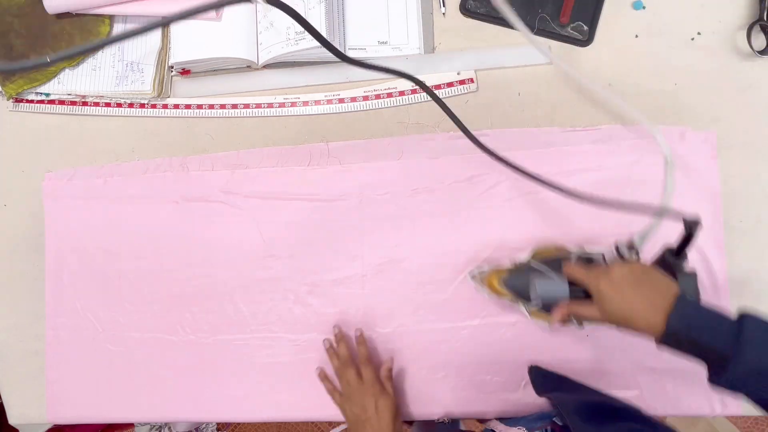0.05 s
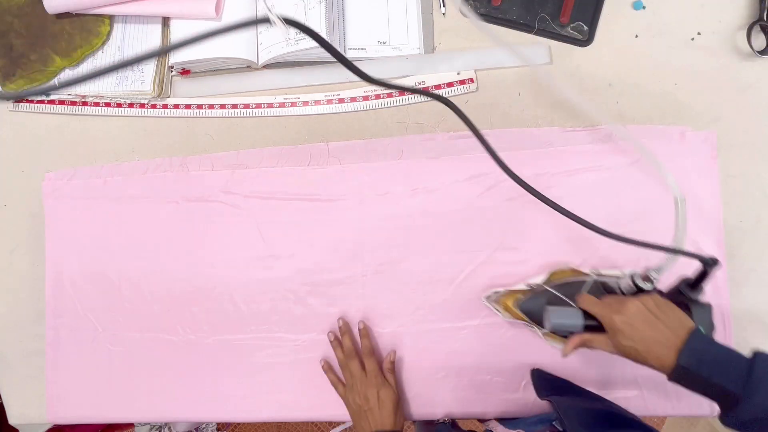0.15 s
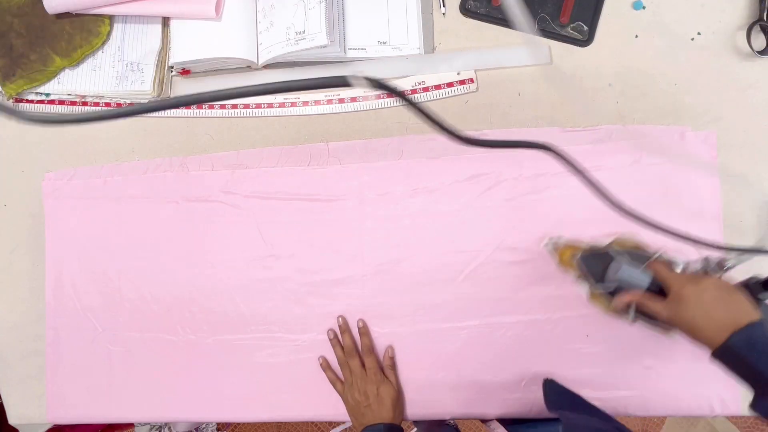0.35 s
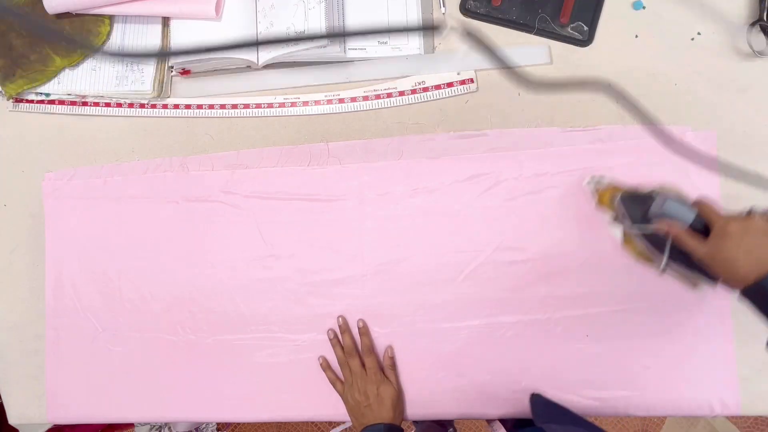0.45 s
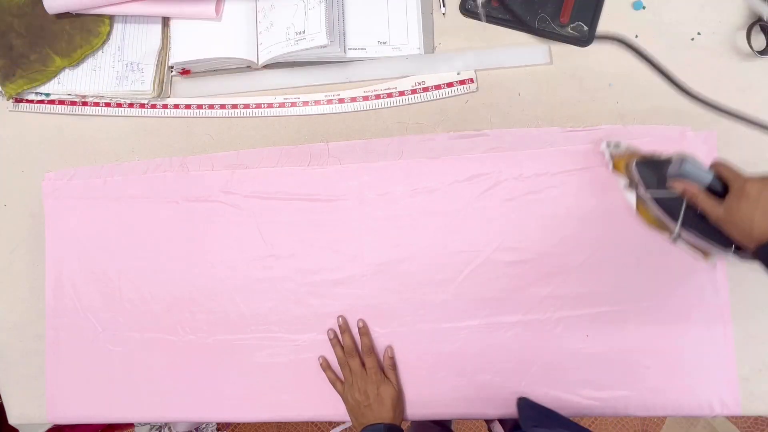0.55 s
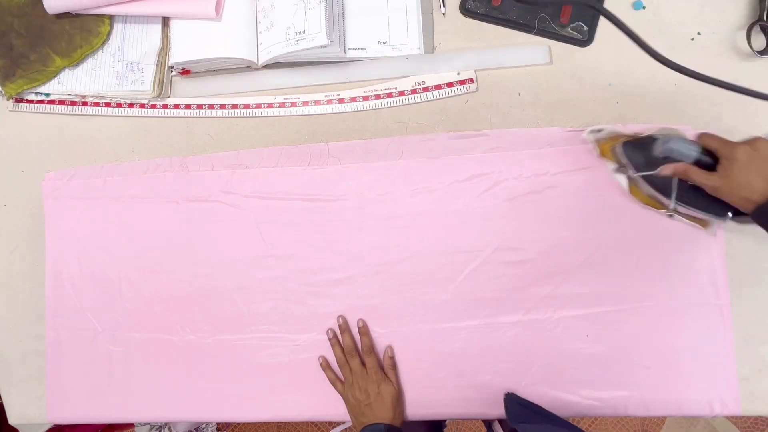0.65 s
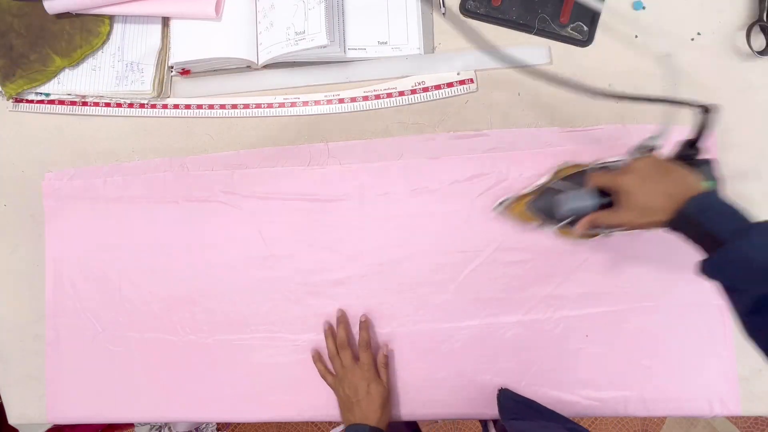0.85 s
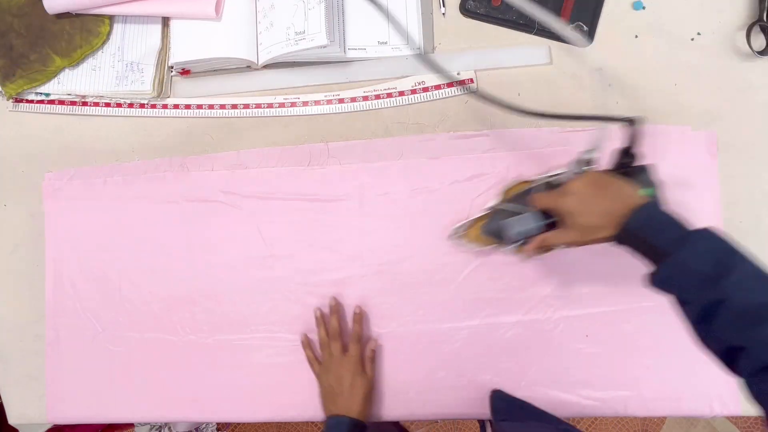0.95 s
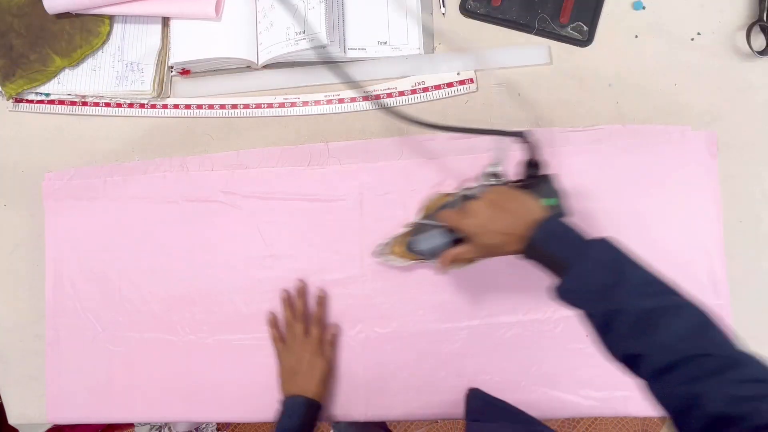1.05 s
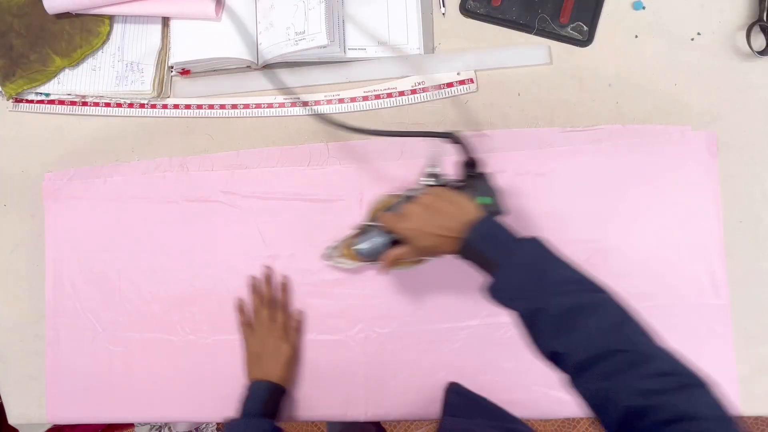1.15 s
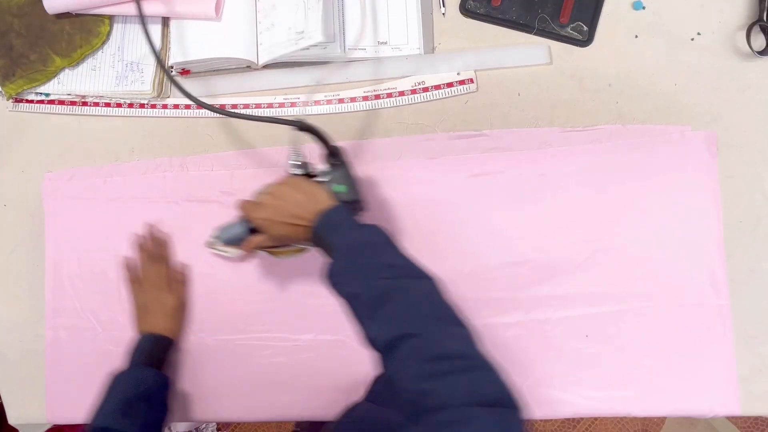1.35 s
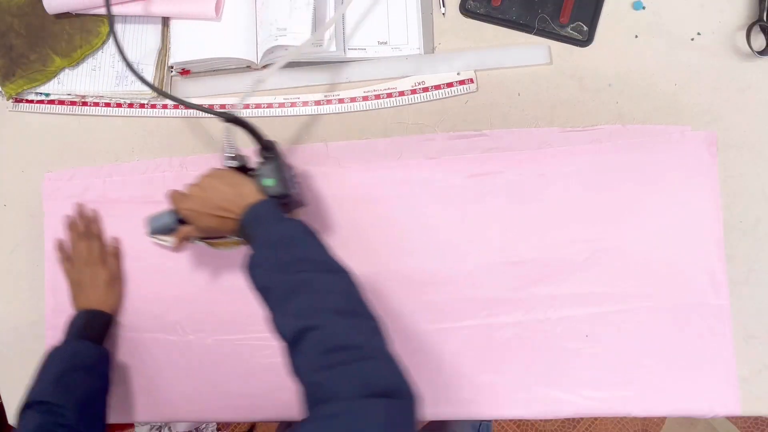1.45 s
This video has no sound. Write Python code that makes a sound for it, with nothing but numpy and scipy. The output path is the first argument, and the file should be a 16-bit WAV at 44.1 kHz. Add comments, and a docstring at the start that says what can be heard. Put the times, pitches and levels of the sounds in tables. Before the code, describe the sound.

An iron slides over cloth on a padded table, close by in a quiet room. At about 0.2 seconds it comes down with a low, cushioned bump. A short, sharp scuff follows near 0.45 seconds. Two quick hissing swishes come at about 0.7 and 0.8 seconds and fade. From 1.2 to 1.5 seconds there is a duller, quieter rub with soft knocks and a faint table rumble.

```python
"""A low bump, a sharp scuff, two swishes, then a duller rub with soft knocks: an iron works over cloth on a
padded table in a quiet room. Its weight rings the table top and squashes the padding; the edge of its sole
catches the cloth. As it turns and is pushed along, threads snap free of the sole in a dense crackle over hiss,
coloured by evenly spaced peaks about 500 Hz apart."""
import sys
import numpy as np
from scipy import signal
from scipy.fft import rfft, irfft
from scipy.io import wavfile

SR = 44100
rng = np.random.default_rng(int(sys.argv[2]) if len(sys.argv) > 2 else 0)


def unload_wav(signal):
    """Save mono or channel-first audio to the path in sys.argv[1] as 16-bit WAV at rate SR, clipped to [-1, 1]."""
    wavfile.write(
        sys.argv[1],
        SR,
        np.round(np.clip(np.atleast_2d(signal).T, -1, 1) * 32767).astype(np.int16),
    )


N = 66150


def swish(gain_db=-.5):
    """Fast light strokes: the weave hisses and rasps, coloured by evenly spaced peaks about 500 Hz apart."""
    # Each row: time in seconds, then relative hiss, body and rasp levels in dB.
    strokes = [(0.58, -97, -71.5, -71), (0.602, -75.5, -75.5, -77), (0.658, -56, -68, -73),
               (0.7, -36.5, -47.5, -48.5), (0.716, -36.5, -42, -45), (0.734, -39, -45.5, -45.5),
               (0.796, -50, -52, -63), (0.82, -39.5, -49.5, -55), (0.84, -39.5, -47.5, -51),
               (0.918, -51, -56.5, -63.5), (0.938, -55, -66, -68), (0.96, -58, -63.5, -70.5),
               (0.988, -60, -84, -74.5), (1.046, -62.5, -75, -77), (1.064, -58, -74.5, -76.5),
               (1.136, -73.5, -83, -86.5), (1.19, -74.5, -84, -84)]
    # Each row: frequency in Hz, gain in dB.
    hiss_spectrum = [(3000, -17), (4400, -7.5), (5100, -1), (6500, -2.5), (8000, 0.5), (9200, -2.5),
                     (10200, -7.5), (11800, -1.5), (13300, -2.5), (14500, 1.5), (16000, -6.5)]
    body_spectrum = [(150, -30), (280, -13.5), (420, -3.5), (700, -3.5), (1100, -3.5), (1650, -8.5),
                     (2200, -30)]
    rasp_spectrum = [(1400, -19.5), (1900, -3), (2600, -2), (3000, -4.5), (3900, -5.5), (4400, -2),
                     (5200, -15.5)]
    # Each row: centre in Hz, width in Hz, lift in dB.
    comb_rings = [(510, 120, 8), (1030, 170, 8), (1520, 110, 11), (2020, 120, 4), (2520, 150, 3)]
    hiss = colour(friction(), hiss_spectrum) * curve(strokes, column=1)
    body = colour(friction(), body_spectrum, comb_rings) * curve(strokes, column=2)
    rasp = colour(friction(), rasp_spectrum, comb_rings) * curve(strokes, column=3)
    return undb(gain_db) * (hiss + body + rasp)


def scuff():
    """The sole's edge catches the cloth: a tick and a bright ringing scrape."""
    # Each row: start in seconds, level in dB, attack and t60 in seconds.
    ticks = [(.4618, -48.5, .001, .04)]
    scrapes = [(.4625, -43, .007, .24)]
    # Each row: frequency in Hz, gain in dB.
    tick_spectrum = [(2200, -31), (2700, -12), (3500, -7), (4350, 6), (5000, -14), (9000, -1), (13000, -2),
                     (16000, -6)]
    scrape_spectrum = [(180, -55), (300, -17.5), (572, -18), (864, -22.5), (1180, -3), (1400, -21.5),
                       (1790, -4), (2220, -14.5), (2370, -17), (2890, -12.5), (3350, -1.5), (5070, -11),
                       (6180, -3), (7050, -12), (9660, -15.5), (13400, -6), (15600, -4.5)]
    # Each row: centre in Hz, width in Hz, lift in dB.
    scrape_rings = [(1167, 35, 8.2), (3380, 390, 7.2), (4440, 180, 3.7), (12900, 900, 3)]
    tick = colour(rng.standard_normal(N), tick_spectrum) * swells(ticks, hold_s=.0027)
    scrape = colour(friction(), scrape_spectrum, scrape_rings) * swells(scrapes, hold_s=.0079)
    return tick + scrape


def glide():
    """A long pressed stroke, with dull rubs as the iron rocks."""
    # Each row: time in seconds, level in dB.
    stroke = [(1.2, -80), (1.235, -63.5), (1.27, -63), (1.32, -58.5), (1.39, -52.5), (1.43, -55),
              (1.47, -62), (1.5, -59.5)]
    # Each row: frequency in Hz, gain in dB.
    spectrum = [(150, -2), (290, -4), (350, -17), (534, -9), (821, -9), (1530, -3.5), (1950, -10),
                (3400, -10.5), (3800, -11), (5500, -8), (6600, -19), (11900, -13.5), (16000, -17)]
    # Each row: start in seconds, level in dB, attack and t60 in seconds, centre in Hz, width in octaves.
    rubs = [(1.193, -52, 0.023, 0.14, 1070, 0.61), (1.196, -54.5, 0.016, 0.11, 420, .3),
            (1.281, -55, 0.0094, 0.14, 1500, 0.19), (1.301, -51, 0.0033, 0.33, 1340, 0.33),
            (1.318, -50, 0.0031, 0.19, 306, 0.49), (1.438, -62, 0.0079, 0.6, 514, 0.18),
            (1.45, -69, 0.016, 0.16, 1520, 0.11)]
    out = colour(friction(), spectrum, rings=[(1500, 520, 3.2), (5360, 3600, 2.6)]) * curve(stroke)
    for *event, hz, octaves in rubs:
        band = [(hz * 2 ** (k * octaves), -3 * k * k) for k in range(-2, 3)]
        out += colour(friction(), band) * swells([event], hold_s=.012)
    return out


def bumps():
    """The iron's weight comes down in soft pushes that ring the table top."""
    # Each row: frequency in Hz, gain in dB, t60 in seconds.
    modes = [(28.15, 0.5, 0.36), (42, -8, 0.29), (103.53, 5, 0.23), (74, -22.5, .15), (145.8, -19, 0.45),
             (234, -12, 0.24), (277, -2.5, 0.071), (330, -4, .08), (386, -22.5, .15), (440, -39, .15)]
    # Each row: start in seconds, impulse in dB, contact time in seconds.
    pushes = [(0.207, -40, 0.005), (0.2262, -22.5, 0.005), (.335, -32, 0.015), (0.904, -47, 0.023),
              (0.928, -57, 0.0083), (0.954, -49, 0.021), (1.076, -52, 0.0089), (1.179, -52, 0.011),
              (1.281, -41, 0.018), (1.32, -47.5, 0.0043), (1.441, -63.5, 0.002)]
    t = clock()
    ring = sum(undb(db - 60 * t / t60_s) * np.sin(2 * np.pi * hz * t) for hz, db, t60_s in modes)
    force = np.zeros(N)
    for start_s, db, contact_s in pushes:
        pulse = np.sin(np.pi * np.clip((t - start_s) / contact_s, 0, 1)) ** 2
        force += undb(db) * pulse / pulse.sum()
    return signal.fftconvolve(force, ring)[:N]


def padding():
    """The padding crunches under the landing."""
    # Each row: start in seconds, level in dB, attack and t60 in seconds.
    landing = [(0.21, -55, 0.023, 0.22), (0.243, -47.5, .03, 0.22)]
    # Each row: frequency in Hz, gain in dB.
    spectrum = [(120, -2.5), (230, -6), (330, -14.5), (450, -12.5), (600, -18), (880, -21), (1300, -32),
                (1700, -40), (2200, -45), (4000, -61), (6000, -77.5)]
    return colour(friction(), spectrum) * swells(landing, hold_s=.029)


def tremble():
    """The table trembles under the moving iron."""
    # Each row: time in seconds, level in dB.
    levels = [(0, -90), (.45, -73), (.8, -78), (.93, -74), (1.02, -74.5), (1.15, -66.5), (1.36, -54.5),
              (1.5, -63.5)]
    # Each row: frequency in Hz, gain in dB.
    spectrum = [(18, -16.5), (30, -13), (60, -12.5), (85, -9), (103, -2.5), (130, -15.5), (250, -16),
                (600, -34)]
    return colour(rng.standard_normal(N), spectrum) * curve(levels)


def rattle():
    """The iron's shell rattles faintly on touchdown."""
    # Each row: start in seconds, level in dB, attack and t60 in seconds.
    touchdown = [(.2105, -68.5, .004, 0.27)]
    # Each row: frequency in Hz, gain in dB.
    spectrum = [(900, -19.5), (1300, -1), (1800, -9), (2300, -22.5), (4000, -13), (6000, -27.5)]
    # Each row: centre in Hz, width in Hz, lift in dB.
    shell_rings = [(1310, 120, 6.5), (1709, 190, 15), (3970, 200, 14.5)]
    return colour(friction(), spectrum, shell_rings) * swells(touchdown, hold_s=.03)


def brush():
    """Faint brushing while the iron is carried."""
    # Each row: time in seconds, level in dB.
    levels = [(0, -85), (.1, -83.5), (.17, -74.5), (.23, -74), (.28, -83.5), (.33, -90), (.44, -82.5),
              (.56, -75), (.6, -84)]
    # Each row: frequency in Hz, gain in dB.
    spectrum = [(200, -17), (750, -2.5), (2000, -9), (4000, -8), (9000, -11), (16000, -17)]
    return colour(friction(), spectrum) * curve(levels)


def friction(threads_per_s=5000, spread_db=2.5, snap_share=.33, judder_db=.76, judder_per_s=90):
    """Threads snap free of the sole in a dense crackle over smooth hiss; the grip judders."""
    snaps = (rng.random(N) < threads_per_s / SR) * rng.standard_normal(N)
    snaps *= undb(spread_db * rng.standard_normal(N))
    grip = np.interp(clock() * judder_per_s, np.arange(1000), rng.standard_normal(1000))
    hiss = np.sqrt(1 - snap_share) * rng.standard_normal(N)
    return (np.sqrt(snap_share) * unit(snaps) + hiss) * undb(judder_db * grip)


def room(x, near_db=-4.5, near_above_hz=2600, near_decay_s=.003, tail_db=-14.5, tail_t60_s=.25):
    """Treble scatters off the iron and things on the table; the walls add a short diffuse tail."""
    t = clock()
    scatter = rng.standard_normal(N) * np.exp(-t / near_decay_s) * (t > .0012)
    near = signal.sosfilt(signal.butter(2, near_above_hz, "high", fs=SR, output="sos"), scatter)
    tail = rng.standard_normal(N) * undb(-60 * t / tail_t60_s) * (t > .005)
    echoes = undb(near_db) * near / np.linalg.norm(near) + undb(tail_db) * tail / np.linalg.norm(tail)
    return x + signal.fftconvolve(x, echoes)[:N]


def air(level_db=-66.5):
    """Steady, faint room rumble."""
    # Each row: frequency in Hz, gain in dB.
    spectrum = [(12, -38.5), (20, 2.5), (38, -13), (74, -18), (177, -26.5), (459, -37.5), (1290, -38.5),
                (2140, -45.5), (5530, -53.5), (13200, -52), (16000, -63)]
    return undb(level_db) * colour(rng.standard_normal(N), spectrum)


def colour(x, spectrum, rings=()):
    """Apply a spectrum with 24 dB/octave skirts and resonant lifts; rms 1."""
    hz, gain_db = np.array(spectrum).T
    bins_hz = np.maximum(np.arange(N // 2 + 1) * SR / N, 1)
    db = np.interp(np.log(bins_hz), np.log(hz), gain_db)
    db -= 24 * (np.maximum(np.log2(hz[0] / bins_hz), 0) + np.maximum(np.log2(bins_hz / hz[-1]), 0))
    for centre_hz, width_hz, lift_db in rings:
        db += lift_db / (1 + (2 * (bins_hz - centre_hz) / width_hz) ** 2)
    return unit(irfft(rfft(x) * undb(db), N))


def curve(levels, column=1):
    """Gain from a level curve; falls 130 dB/s beyond its ends."""
    rows, t = np.array(levels), clock()
    outside_s = np.maximum(rows[0, 0] - t, 0) + np.maximum(t - rows[-1, 0], 0)
    return undb(np.interp(t, rows[:, 0], rows[:, column]) - 130 * outside_s)


def swells(events, hold_s):
    """Summed envelopes: linear attack, hold, exponential release."""
    gain = np.zeros(N)
    for start_s, db, attack_s, t60_s in events:
        age_s = clock() - start_s
        release_db = 60 * np.maximum(age_s - attack_s - hold_s, 0) / t60_s
        gain += np.clip(age_s / attack_s, 0, 1) * undb(db - release_db)
    return gain


def undb(db):
    return 10 ** (np.asarray(db) / 20)


def unit(x):
    return x / np.sqrt(np.mean(x ** 2))


def clock():
    return np.arange(N) / SR


def scene():
    """Mono mix; only the iron and cloth get room echoes."""
    background = air()
    table = bumps() + padding() + tremble()
    iron = rattle() + scuff() + swish() + brush() + glide()
    return (table + room(iron) + background)[None]


def record(dry):
    """Steep low-pass at 15.8 kHz."""
    return signal.sosfilt(signal.ellip(10, .2, 80, 15800, fs=SR, output="sos"), dry)


dry = scene()
out = record(dry)
unload_wav(out)
```